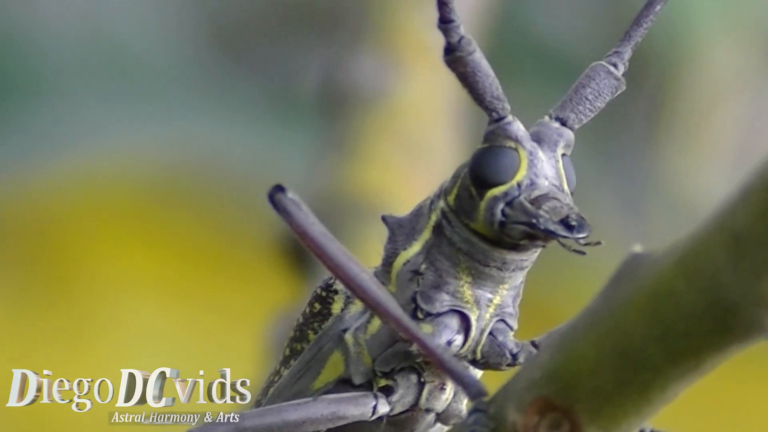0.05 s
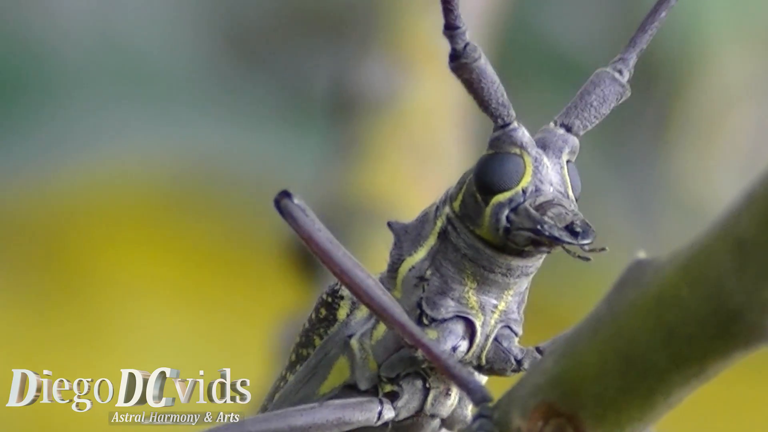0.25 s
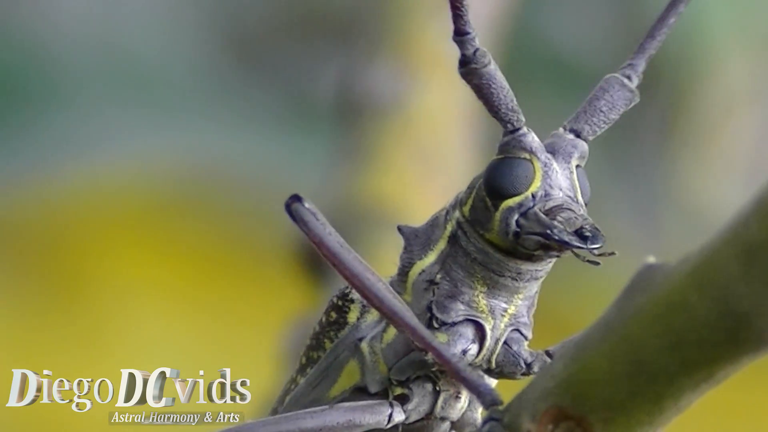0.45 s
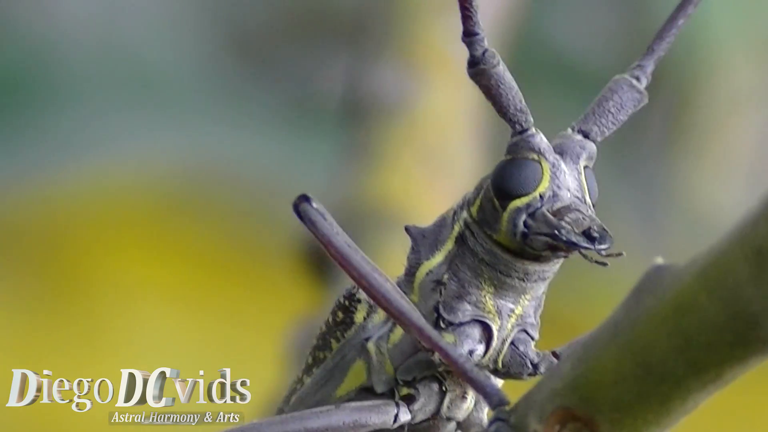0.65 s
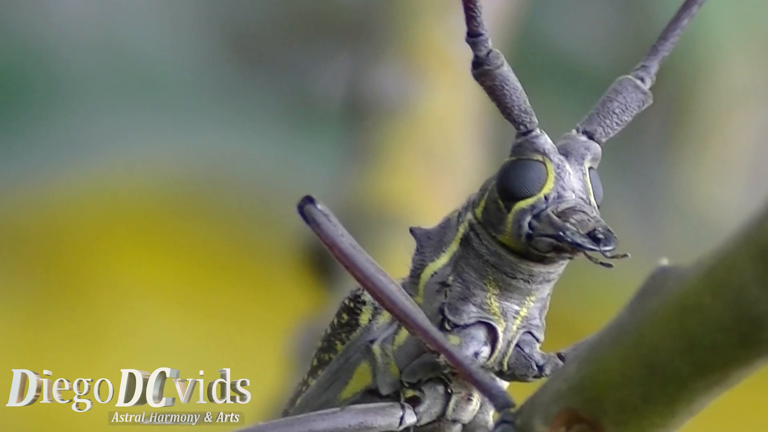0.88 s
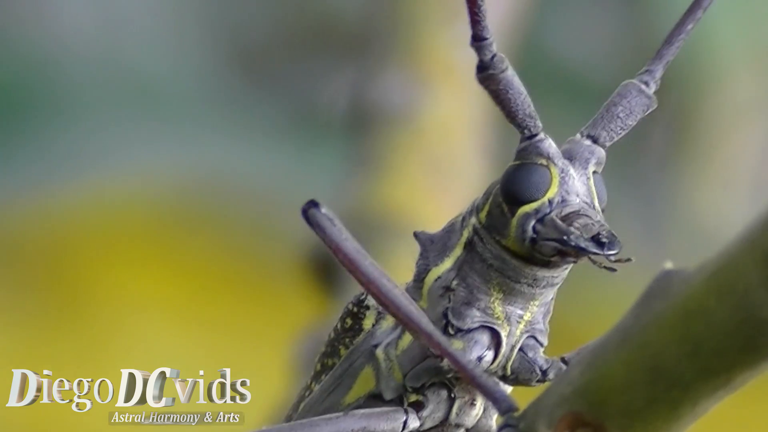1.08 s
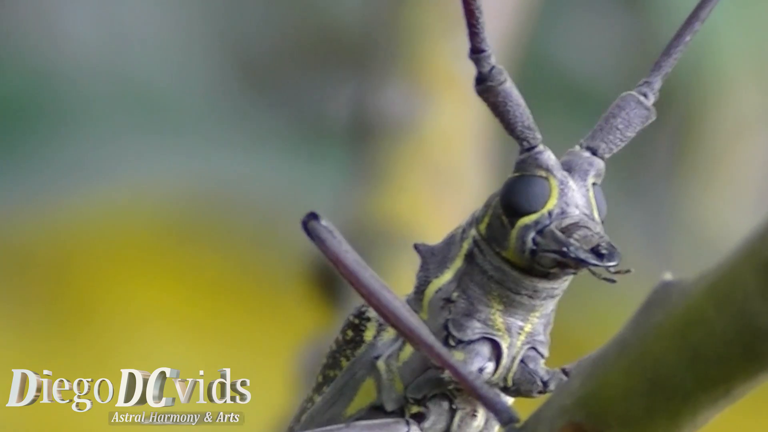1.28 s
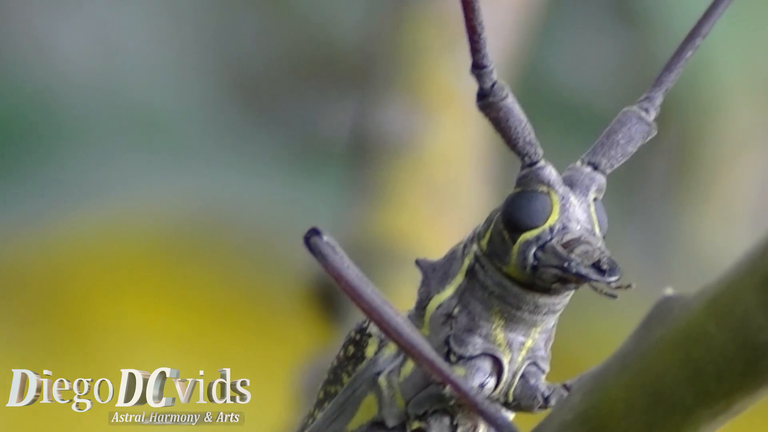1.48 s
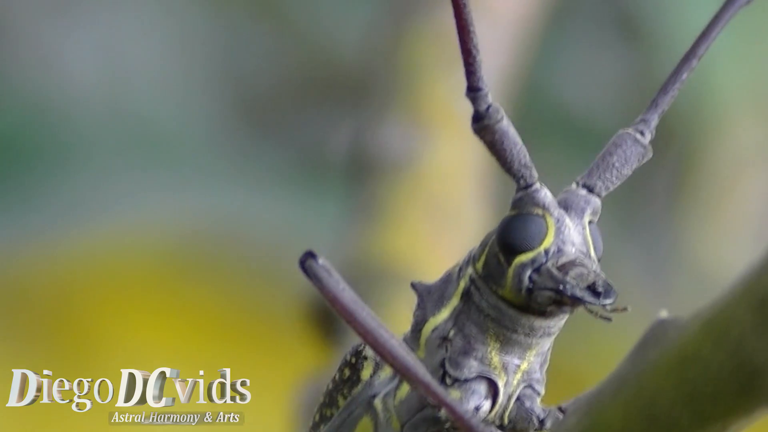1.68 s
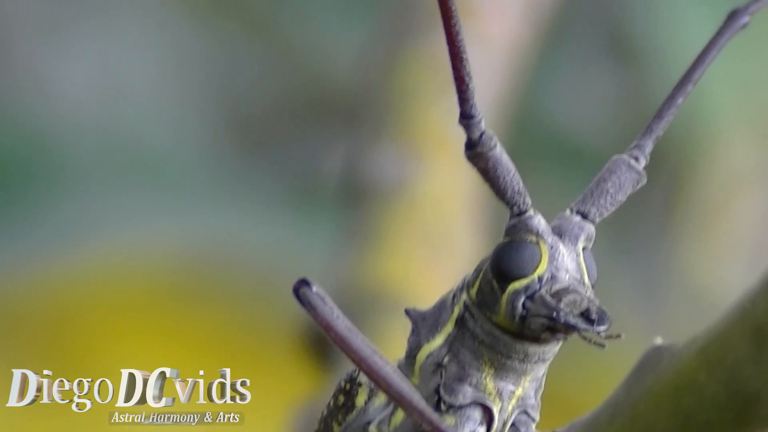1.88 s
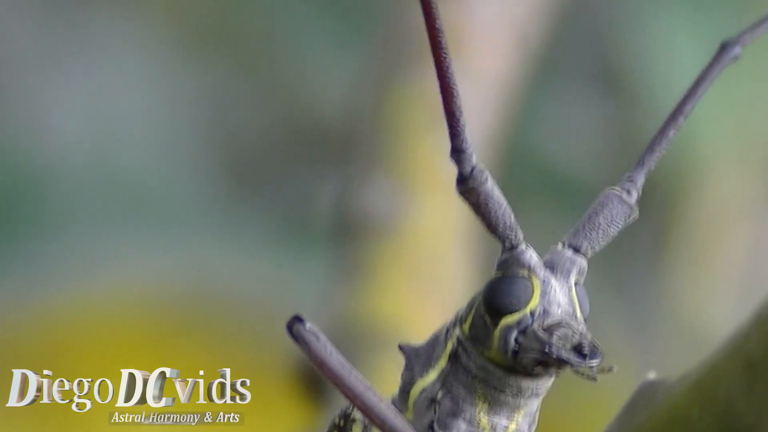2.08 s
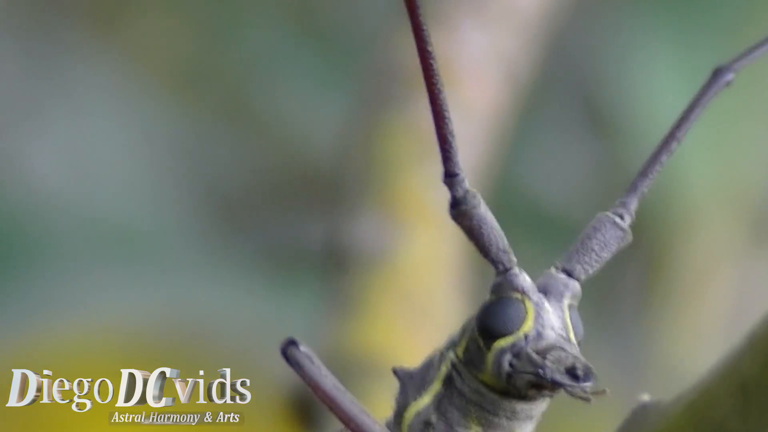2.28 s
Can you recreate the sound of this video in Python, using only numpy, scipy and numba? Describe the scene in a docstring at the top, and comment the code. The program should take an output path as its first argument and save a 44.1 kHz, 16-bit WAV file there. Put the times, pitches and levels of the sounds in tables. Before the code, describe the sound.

A big dog barks hoarsely three times outdoors while a smaller dog answers farther off.

```python
"""In a yard, a big dog gives three hoarse barks; a smaller dog farther off answers three times,
echoed by walls. Each bark is a buzz of the vocal folds mixed with breath, shaped by the throat
and the moving mouth. A bird draws one thin rising whistle and a few faint chirps sound
over a low, steady outdoor hum."""
import sys
import numpy as np
from scipy import signal
from scipy.fft import rfft, irfft
from scipy.io import wavfile
from numba import njit

SR = 44100
rng = np.random.default_rng(int(sys.argv[2]) if len(sys.argv) > 2 else 0)


def digitize_waveform(pressure):
    """Quantize a signal to 16-bit integers and store it at the path in sys.argv[1].

    Rows of a 2-D input are taken as channels; values are limited to [-1, 1].
    """
    field = np.atleast_2d(pressure).T
    bounded = np.clip(field, -1, 1)
    quanta = np.round(bounded * 32767).astype(np.int16)
    wavfile.write(sys.argv[1], SR, quanta)


N = 108045

# how alike the street sounds in the two ears: f/Hz, correlation (1 = the same)
STREET_LIKENESS = [(200, 0.6), (550, 0.31), (1100, 0.34), (6000, -0.38)]


def undb(db):
    """Turn decibels into a gain."""
    return 10 ** (np.asarray(db) / 20)


def unit(x):
    """Scale a sound to an average (RMS) level of 1."""
    return x / np.sqrt(np.mean(x ** 2) + 1e-20)


def over_bins(points):
    """Spread a table of f/Hz, value over the whole spectrum."""
    hz, value = np.array(points, float).T
    return np.interp(np.log(np.fft.rfftfreq(2 * N, 1 / SR) + 1), np.log(hz), value)


def filtered(x, gain):
    """Give each frequency its own gain."""
    return irfft(rfft(x, 2 * N) * gain)[..., :N]


def pan(db):
    """Gains for the two ears, the left one db above the right."""
    return undb(np.array([[db], [-db]]) / 2)


def wander(rate):
    """A random drift of about 1 either way that turns `rate` times a second."""
    return np.interp(np.arange(N) / SR * rate, np.arange(N), rng.standard_normal(N))


def envelope(age, length, attack, release):
    """Rise for `attack` seconds, hold until `length`, then lose 20 dB every `release` seconds."""
    return np.clip(age / attack, 0, 1) * undb(-20 * np.maximum(age - length, 0) / release)


def stereo_noise(likeness):
    """Left and right noise, as alike as the table says."""
    alike = np.clip(over_bins(likeness), -.98, .98)
    mid = filtered(rng.standard_normal(N), np.sqrt((1 + alike) / 2))
    side = filtered(rng.standard_normal(N), np.sqrt((1 - alike) / 2))
    return np.array([mid + side, mid - side])


@njit
def bandpass(x, hz, width):
    """Let through a band of frequencies around a moving centre."""
    y, band_state, low_state = np.empty(len(x)), 0., 0.
    for i in range(len(x)):
        tuning, damping = np.tan(np.pi * hz[i] / SR), width / hz[i]
        band = (band_state + tuning * (x[i] + 1e-18 - low_state)) / (1 + tuning * (tuning + damping))
        band_state = 2 * band - band_state
        low_state += 2 * tuning * band
        y[i] = damping * band
    return y


def resonate(x, table, shift):
    """Steep resonances (f/Hz, width/Hz, level/dB) that all move by the same ratio."""
    return sum(undb(db) * bandpass(bandpass(x, hz * shift, float(width)), hz * shift, float(width))
               for hz, width, db in table)


def reverb(x, tails, likeness, build_s, treble_life=.84):
    """Direct sound plus scattered tails that build up, then fade; the treble dies sooner."""
    t = np.arange(N) / SR
    response = 0
    for fade_s, db in tails:
        noise = stereo_noise(likeness)
        low = filtered(noise, undb(over_bins([(900, -1), (1500, -15), (6000, -62)])))
        tail = low * undb(-60 * t / fade_s) + (noise - low) * undb(-60 * t / (treble_life * fade_s))
        tail *= 1 - np.exp(-t / build_s)
        response += undb(db) * unit(tail) / np.sqrt(N)
    power = 1 + sum(undb(db) ** 2 for _, db in tails)
    return (x + filtered(x, rfft(response, 2 * N))) / np.sqrt(power)


def hum():
    """A low distant hum with a thin hiss, wavering slightly."""
    # tone of the hum: f/Hz, relative level/dB
    spectrum = [(20, -51), (40, -21), (60, -13), (80, -14), (125, -4), (175, -1.5), (240, 1), (350, 1),
                (700, -4.5), (1200, -9.5), (2500, -19), (4500, -27), (6700, -27), (11000, -35),
                (15000, -45)]
    noise = unit(filtered(stereo_noise(STREET_LIKENESS), undb(over_bins(spectrum))))
    return undb(-53.5 + .5 * wander(3.94)) * noise * pan(-3)


def birds(t):
    """A wavering whistle that opens hoarsely, short chirps and one thin note, among trees."""
    # path of the whistle: t/s, pitch/Hz, relative level/dB
    whistle = [(1.899, 5350, -75), (1.935, 5140, -68), (1.981, 5070, -65), (2.09, 5020, -80),
               (2.151, 5120, -69.5), (2.195, 5620, -64), (2.235, 6030, -70), (2.254, 6390, -61),
               (2.315, 6960, -57), (2.341, 8130, -64), (2.369, 8230, -62), (2.378, 7300, -52),
               (2.406, 7140, -69)]
    # resonances of its hoarse opening: f/Hz, width/Hz, level/dB
    wheeze_bands = [(4340, 750, 3), (5020, 200, 5), (6600, 3400, -7)]
    # chirps: t/s, length/s, top pitch/Hz, relative level/dB, arch and waver as shares of the pitch
    chirps = [(0.89, 0.15, 3530, -63, .1, 0.069), (0.88, 0.18, 9800, -77, .06, 0.037),
              (1.28, 0.064, 3450, -59.5, 0.5, 0.013), (1.274, 0.19, 9400, -77.5, 0, 0.077),
              (2.161, 0.099, 4300, -65.5, 0.3, .06)]
    # sound scattered by trees: time to fade 60 dB/s, level against the direct sound/dB
    trees = [(.4, 3.7)]
    times, hz, db = np.array(whistle).T
    phase = 2 * np.pi * np.cumsum(np.interp(t, times, hz) * (1 + .0147 * wander(900))) / SR
    whistle_db = np.interp(t, times, db, left=-np.inf, right=-np.inf) + 3.5 * wander(70) - 2
    out = undb(whistle_db) * (np.sin(phase) + undb(-21) * np.sin(2 * phase))
    wheeze_age = t - 1.887
    drop = 1 + .22 * np.exp(-np.maximum(wheeze_age, 0) / .031)  # starts high and falls
    wheeze = unit(resonate(rng.standard_normal(N), wheeze_bands, drop))
    out += undb(-64) * wheeze * envelope(wheeze_age, length=.21, attack=.072, release=.077)
    for start, length, top_hz, chirp_db, depth, waver in chirps:
        arch = np.sin(np.pi * np.clip((t - start) / length, 0, 1))
        pitch = top_hz * (1 + depth * (arch - 1) + waver * wander(1500))
        out += undb(chirp_db) * arch * np.sin(2 * np.pi * np.cumsum(pitch) / SR)
    thin_note = np.sin(2 * np.pi * np.cumsum(4180 * (1 + .0088 * wander(160))) / SR)
    out += undb(-76) * thin_note * envelope(t - 1.23, length=.29, attack=.13, release=.054)
    return reverb(out * np.sqrt(2), trees, STREET_LIKENESS, build_s=.0054)


def vocal_folds(hz, jitter, shimmer_db, rough):
    """Pulses, uneven in pitch (jitter) and level (shimmer), each with a puff of rushing air."""
    cycles = np.cumsum(hz * (1 + jitter * wander(150))) / SR
    pulses = np.diff(np.floor(cycles), prepend=0)
    air = rng.standard_normal(N) * np.exp(-(cycles % 1) / .59)
    rough = np.clip(rough, 0, 1)
    buzz = np.sqrt(1 - rough ** 2) * unit(pulses) + rough * unit(air)
    return buzz * undb(shimmer_db * wander(150))


def wall_echoes(x, t):
    """Walls send the sound back later and weaker."""
    # one echo a row: delay/s, level/dB
    echoes = [(0.10, -22), (0.16, -6.5), (0.205, -17), (0.28, -16.5)]
    return x + sum(undb(db) * np.interp(t - delay, t, x, left=0) for delay, db in echoes)


def far_dog(t):
    """Higher barks that rise in pitch: a clear throat tone and a hoarse, mostly scattered mouth sound."""
    # barks: t/s, length/s, level/dB, pitch/Hz, roughness 0-1, mouth sound/dB, throat resonance/Hz,
    # jaw resonance/dB, mouth opening at the start 0-1
    answers = [(0.986, 0.081, -36, 288, 0.29, -6.5, 550, -9.5, .02),
               (1.414, 0.11, -44, 287.8, 0.73, 4.5, 600, 1.5, .3),
               (1.983, 0.10, -40.5, 311.6, .3, 2, 625, 3.5, .15)]
    # resonances of the chest and of the open mouth: f/Hz, width/Hz, level/dB
    chest = [(367, 260, -52)]
    mouth_bands = [(520, 57, 4.5), (1044, 670, -11.5), (1563, 118, -1.5), (1820, 72, -6.5),
                   (2197, 140, -13), (2478, 240, -13.5), (2970, 67, -15.5), (6500, 2200, -35)]
    # street reverb of the throat and mouth sounds: time to fade 60 dB/s, level against direct sound/dB
    throat_tails = [(0.251, -7), (1.1, -0.5)]
    mouth_tails = [(.45, 3.2), (1.2, 6)]
    attack_s, release_s, pitch_rise, mouth_swing = .0019, .013, .16, .17
    throat_sound, mouth_sound = 0, 0
    for start, length, db, hz, rough, mouth_db, throat_hz, jaw_db, ajar in answers:
        age = t - start
        opening = np.clip(ajar + age / length / .7, 0, 1)
        pitch = hz * (1 + pitch_rise * (opening - .75))
        effort = envelope(age, length, attack_s, release_s)
        level = undb(db) * np.sqrt(np.mean(effort ** 2))
        clear, hoarse = (vocal_folds(pitch, jitter=.06 * r, shimmer_db=1.5, rough=r)
                         for r in (rough, rough + .4))
        yelp = envelope(age, .075, attack_s, release_s)  # the clear tone ends first
        throat_sound += level * unit(yelp * resonate(clear, chest + [(throat_hz, 197, 0)], np.ones(N)))
        bright = resonate(hoarse, mouth_bands + [(946, 200, jaw_db)], 1 + mouth_swing * (opening - 1))
        mouth_sound += level * undb(mouth_db) * unit(effort * opening ** .57 * bright)
    left, right = (reverb(wall_echoes(throat_sound, t), throat_tails, STREET_LIKENESS, build_s=.0019)
                   + reverb(wall_echoes(mouth_sound, t), mouth_tails, STREET_LIKENESS, build_s=.018))
    left = np.interp(t - .00015, t, left)  # reaches the left ear later
    return np.array([left, right]) * pan(-3.5)


def yard_colour():
    """Gain at each frequency: the yard rings at a few narrow pitches, and the bass falls away."""
    # standing waves in the yard: f/Hz, width/Hz, boost/dB
    standing_waves = [(519.5, 22, 4), (675, 42, 5.5), (786, 96, 3), (1485, 66, 4), (5085, 41, 7.5),
                      (7820, 300, 11)]
    low_cut_hz = 214
    f = np.fft.rfftfreq(2 * N, 1 / SR)
    rings = 1 + sum((undb(db) - 1) / (1 + 2j * (f - hz) / width) for hz, width, db in standing_waves)
    s = 1j * f / low_cut_hz
    return rings * s ** 2 / (s ** 2 + np.sqrt(2) * s + 1)


def big_dog(t):
    """Hoarse barks: pitch and resonances arch with the jaw; brightest where the mouth is widest."""
    # barks: t/s, length/s, level/dB, pitch/Hz, throat size as a frequency ratio, treble/dB, attack/s,
    # rasp/dB, widest mouth as a share of the length, jaw resonance at start/Hz, at end/Hz,
    # its level at start/dB, at end/dB
    barks = [(0.205, 0.19, -26, 131, 0.98, -2, 0.051, -28, .54, 884, 774, 1.5, -3.5),
             (0.546, 0.185, -28, 139, 0.97, -1.5, 0.064, -27.5, 0.43, 671, 720, -0.5, 6.5),
             (1.671, 0.19, -28.5, 131, 1.0, 0, 0.016, -26.5, 0.41, 893, 778, 6, -2)]
    # resonances of the throat and of the muzzle: f/Hz, width/Hz, level/dB
    throat = [(418, 190, -8), (515, 100, 1.5), (642, 132, 1), (842, 182, -5)]
    muzzle = [(1491, 302, -5), (2026, 170, -9), (2270, 286, -16.5)]
    # rasp of the bark past the teeth: f/Hz, relative level/dB
    teeth = [(1000, -45), (2700, 2), (4200, 11.5), (5400, 20.5), (8000, 8.5), (11500, 6), (14500, -15)]
    # yard reverb: time to fade 60 dB/s, level against the direct sound/dB
    yard_tails = [(0.319, -3), (1.301, -5)]
    # how alike that reverb is in the two ears: f/Hz, correlation
    yard_likeness = [(200, .9), (800, .88), (1700, .75), (6000, 0.05)]
    # how far the left ear is ahead: f/Hz, phase/radians
    left_lead = [(60, -10), (250, 1.43), (550, 0.89), (900, 1.35), (1800, 1.36), (3400, 2.5), (5400, 2),
                 (12000, 19.5)]
    # left ear minus right ear: f/Hz, level/dB
    balance = [(200, -2.5), (550, -1.5), (900, 0), (1600, 2.5), (3500, 0.5), (10000, -0.5)]
    release_s, pitch_arch, jaw_swing, jaw_width_hz = .06, .14, .25, 65
    out, colour = 0, yard_colour()
    for (start, length, db, hz, size, treble_db, attack, rasp_db, widest,
         first_hz, last_hz, first_db, last_db) in barks:
        age = t - start
        progress = np.clip(age / (length + release_s), 0, 1)
        jaw = np.abs(np.sin(np.pi * progress ** .75))  # opens faster than it shuts
        mouth = np.exp(-.5 * ((age / length - widest) / .31) ** 2)
        buzz = vocal_folds(hz * (1 + pitch_arch * (jaw - .85)), jitter=.085, shimmer_db=3, rough=.88)
        shift = size * (1 + jaw_swing * (jaw - .85))
        glide = np.interp(age, [0, length], [1, last_hz / first_hz])
        jaw_ring = resonate(buzz, [(first_hz, jaw_width_hz, 0)], glide)
        jaw_ring *= undb(np.interp(age, [0, length], [first_db, last_db]))
        treble = undb(treble_db) * mouth ** .52 * resonate(buzz, muzzle, shift)
        voice = resonate(buzz, throat, shift) + jaw_ring + treble
        rasp = unit(filtered(buzz + rng.standard_normal(N), colour * undb(over_bins(teeth))))
        effort = envelope(age, length, attack, release_s)
        bark = unit(filtered(voice * effort, colour)) * np.sqrt(np.mean(effort ** 2))
        out += undb(db) * (bark + undb(rasp_db) * mouth * rasp * effort)
    in_yard = reverb(out, yard_tails, yard_likeness, build_s=.0022, treble_life=.89)
    ears = np.array([[.5], [-.5]])
    return filtered(in_yard, undb(ears * over_bins(balance)) * np.exp(1j * ears * over_bins(left_lead)))


def scene():
    """Both dogs, the birds and the hum, added up in stereo."""
    t = np.arange(N) / SR
    return big_dog(t) + far_dog(t) + birds(t) + hum()


def record(dry):
    """Cut off the very highest treble."""
    top_hz = 15100
    return signal.sosfilt(signal.ellip(8, .2, 70, top_hz, fs=SR, output="sos"), dry)


dry = scene()
out = record(dry)
digitize_waveform(out)
```